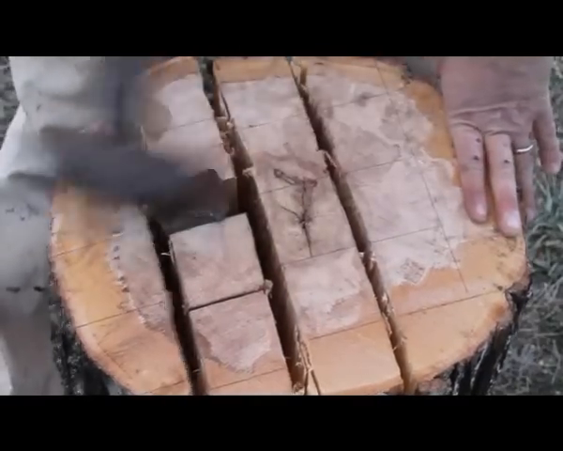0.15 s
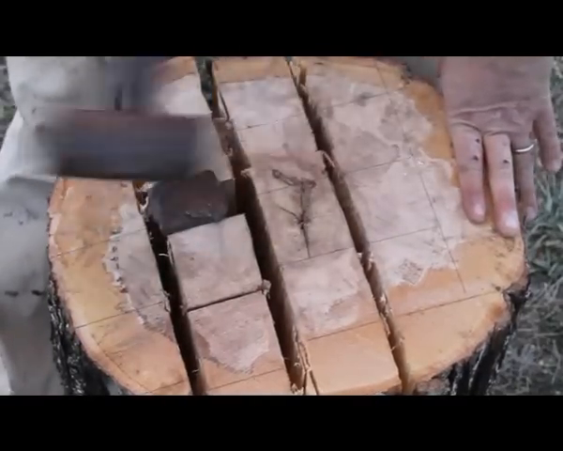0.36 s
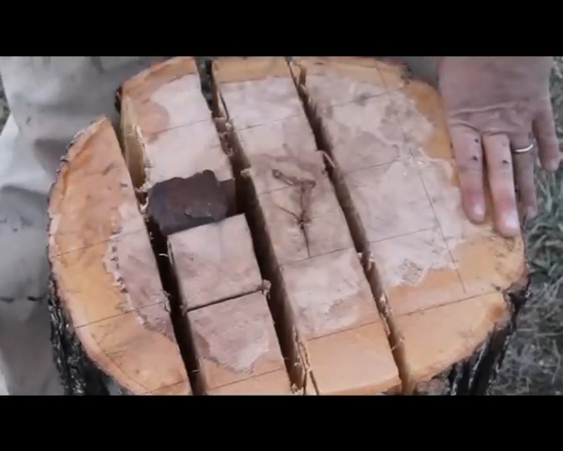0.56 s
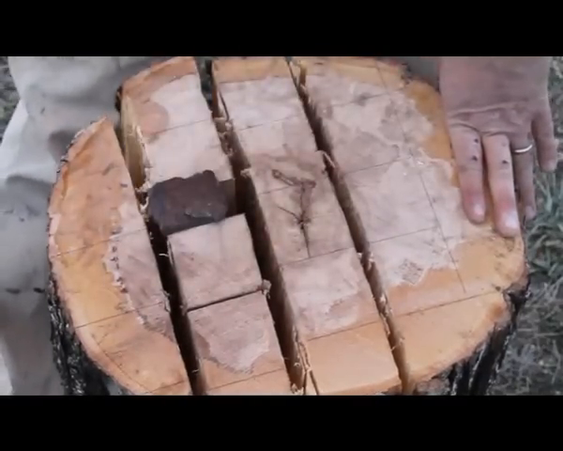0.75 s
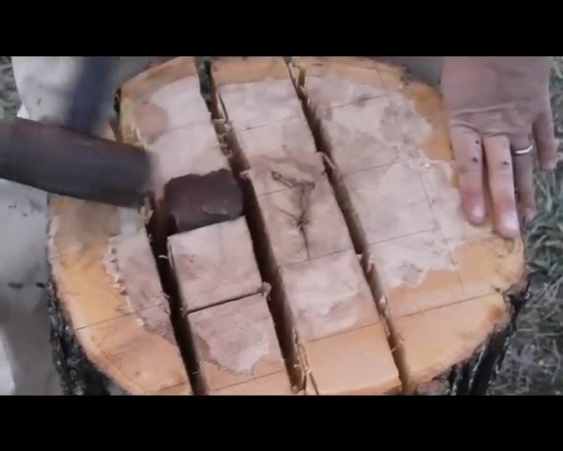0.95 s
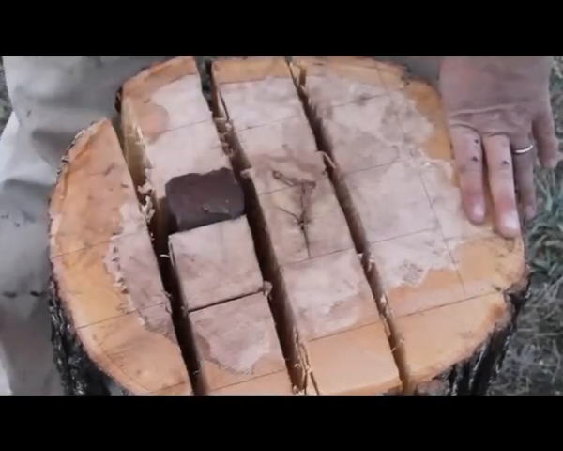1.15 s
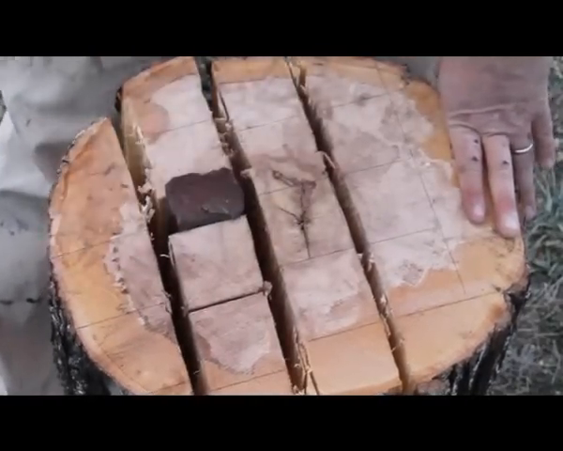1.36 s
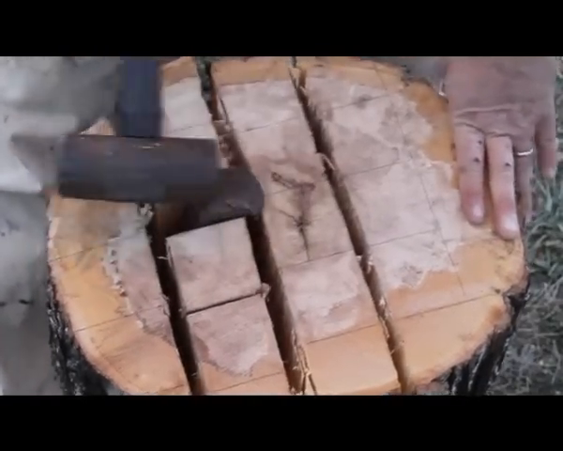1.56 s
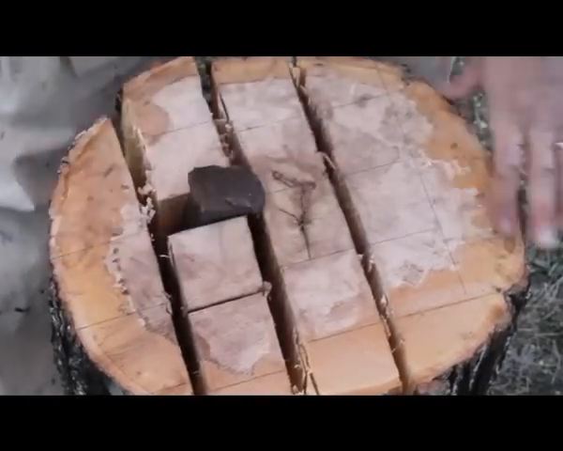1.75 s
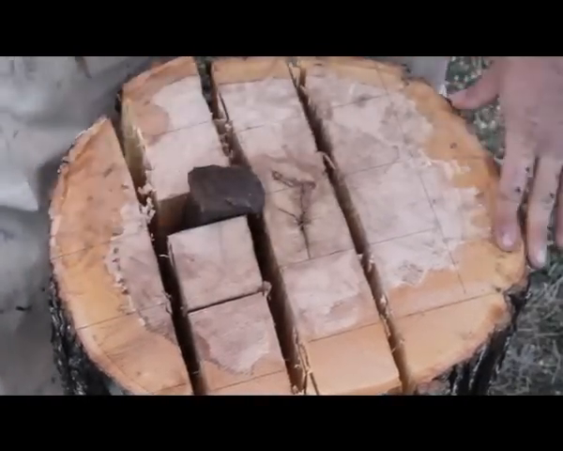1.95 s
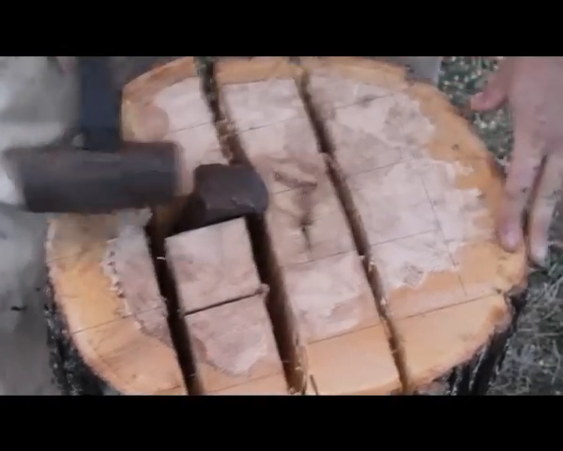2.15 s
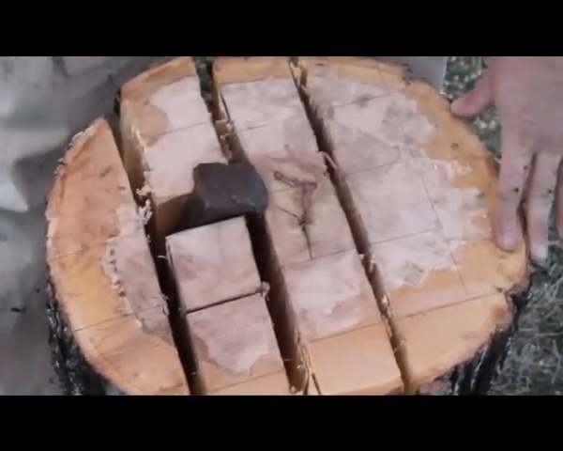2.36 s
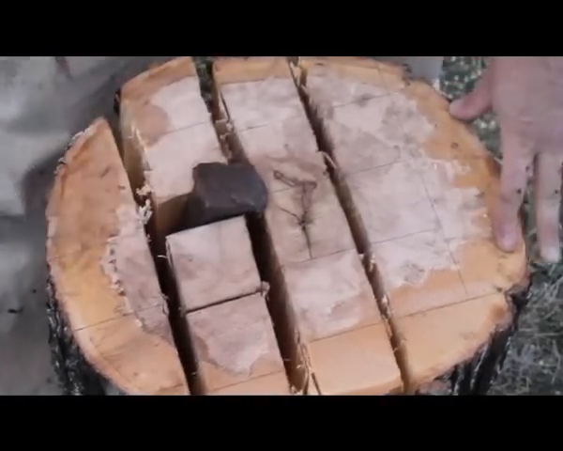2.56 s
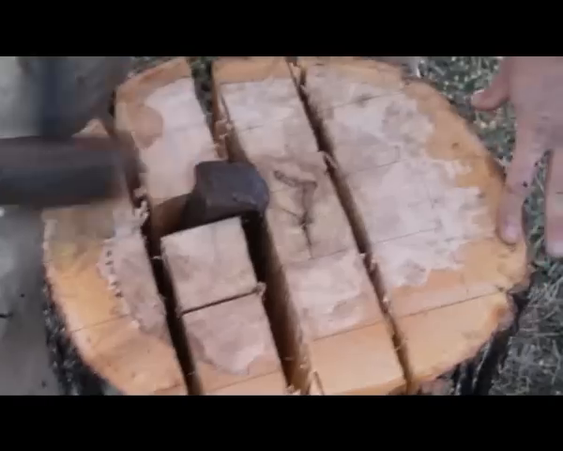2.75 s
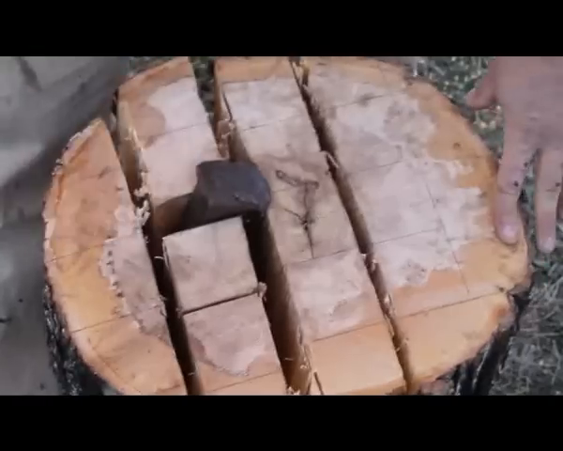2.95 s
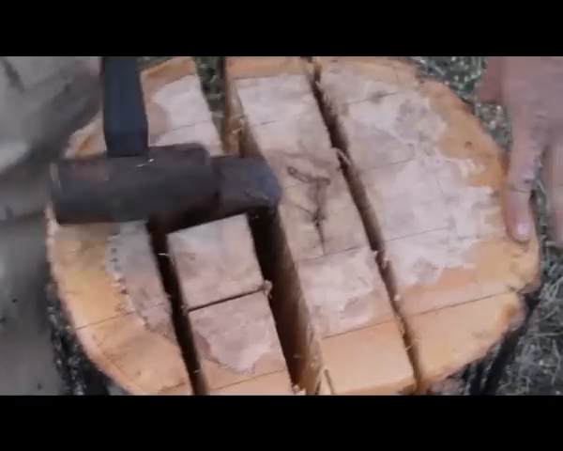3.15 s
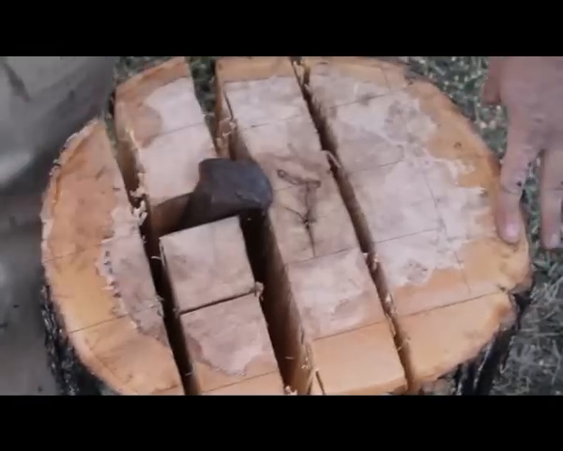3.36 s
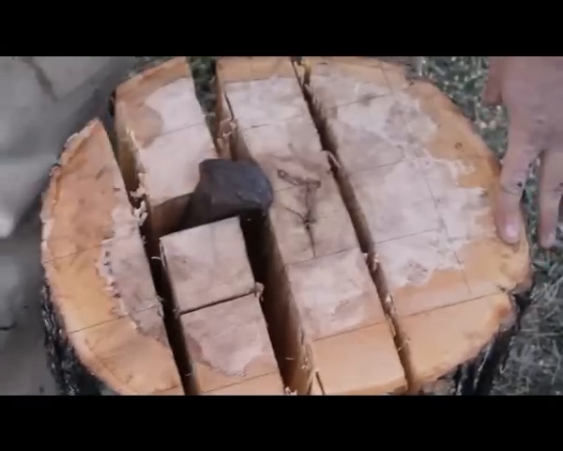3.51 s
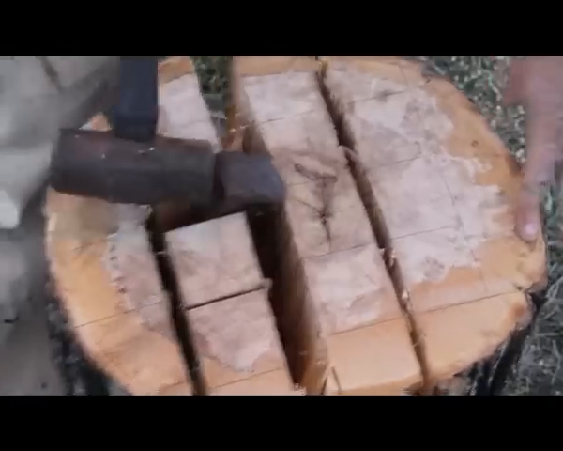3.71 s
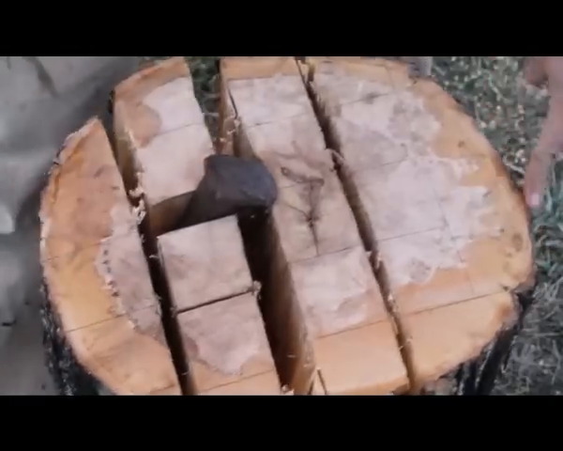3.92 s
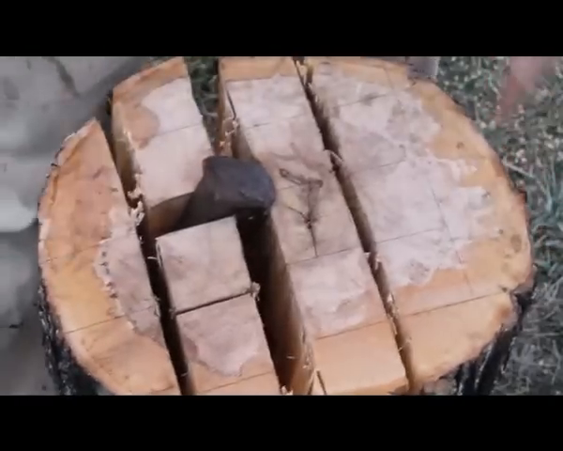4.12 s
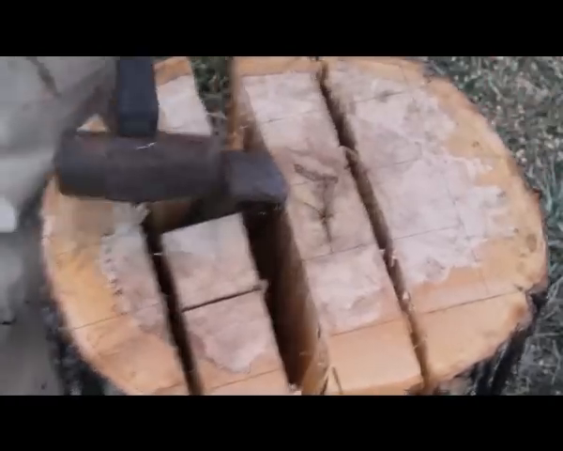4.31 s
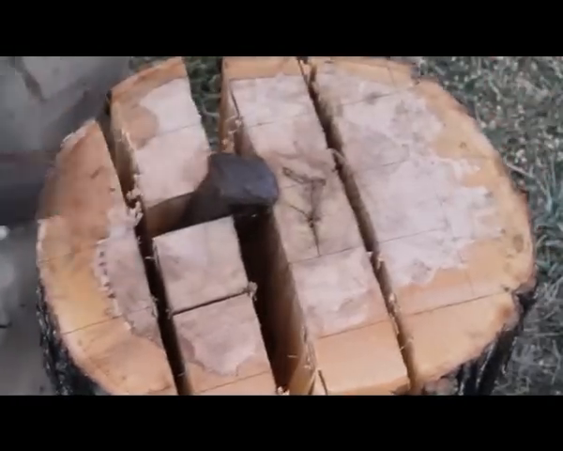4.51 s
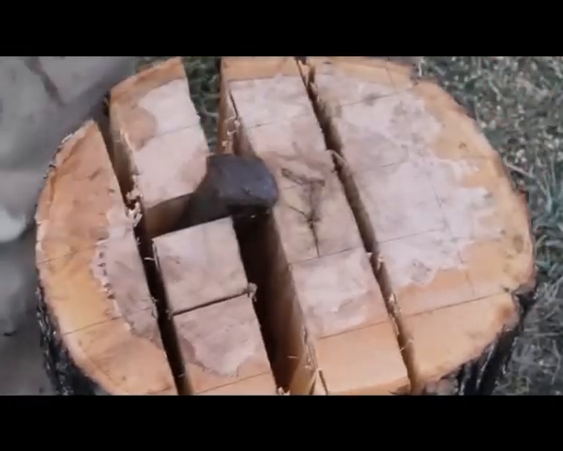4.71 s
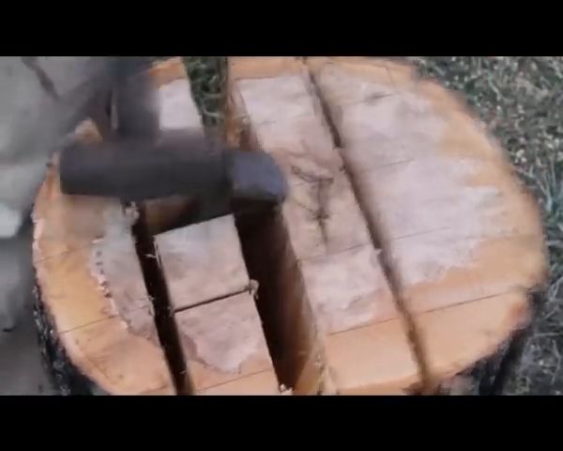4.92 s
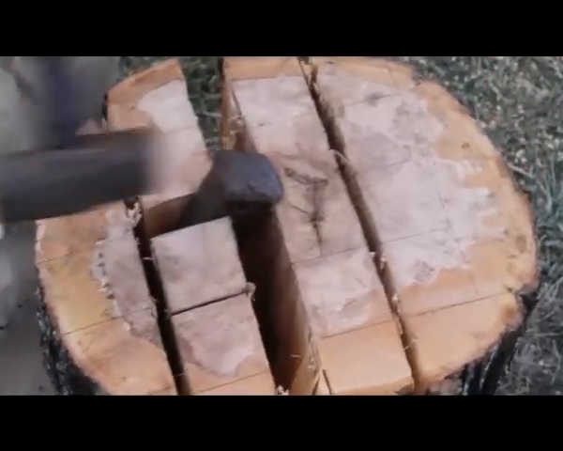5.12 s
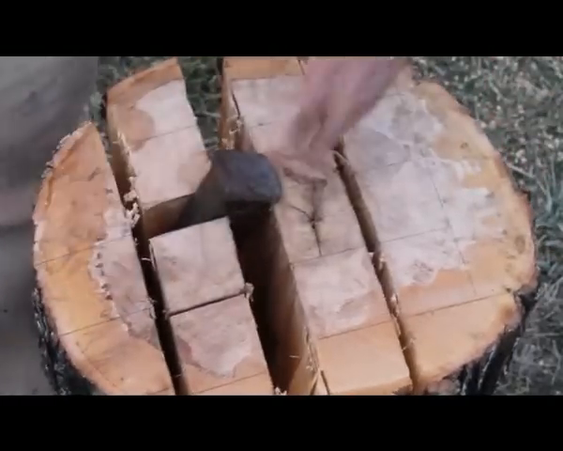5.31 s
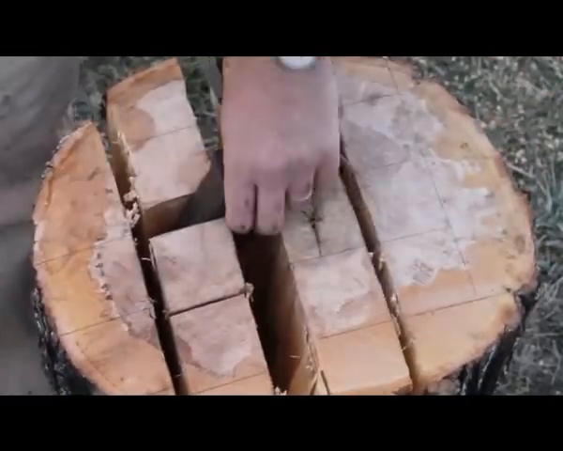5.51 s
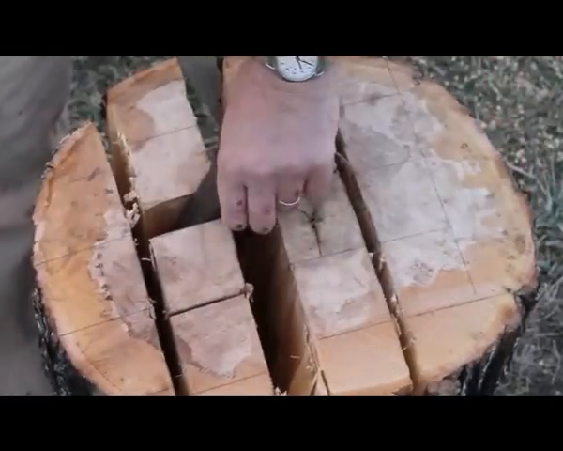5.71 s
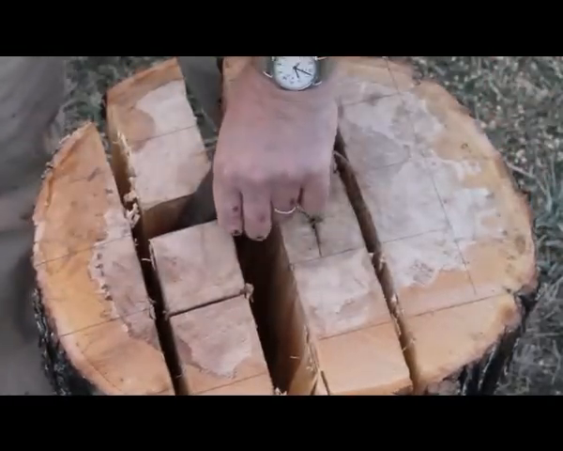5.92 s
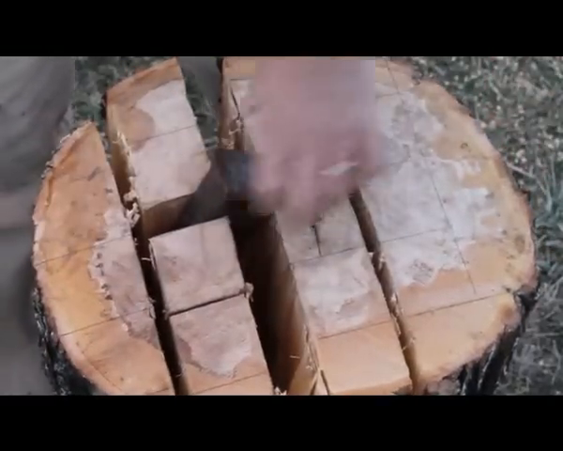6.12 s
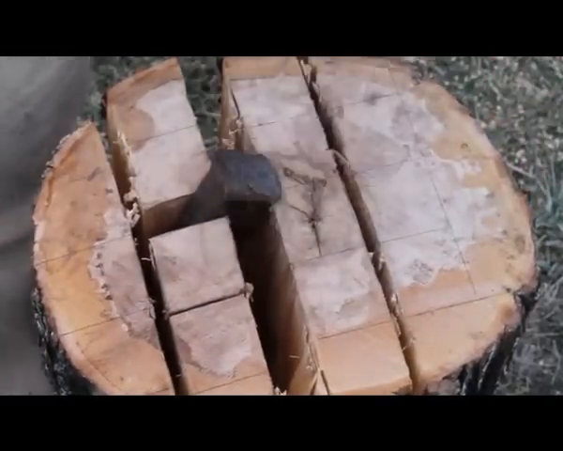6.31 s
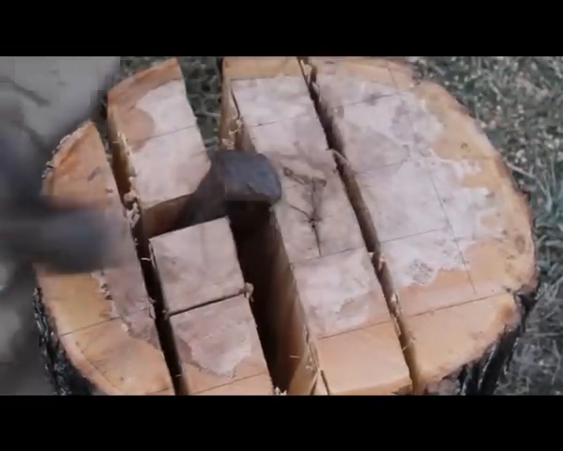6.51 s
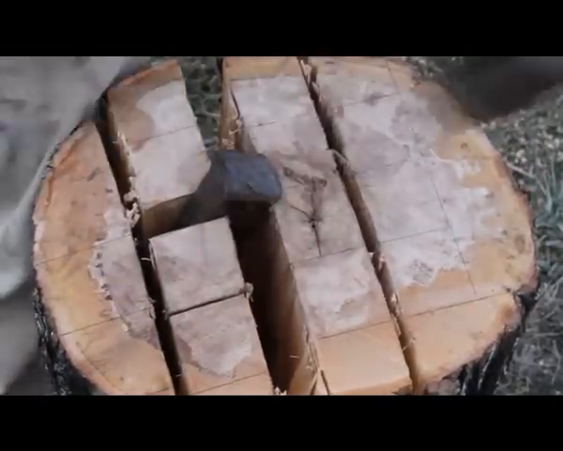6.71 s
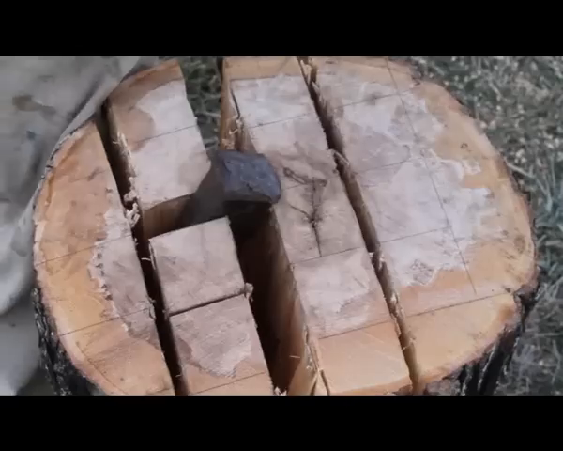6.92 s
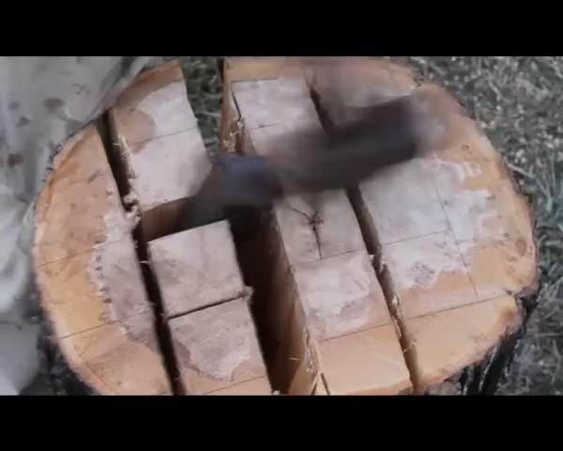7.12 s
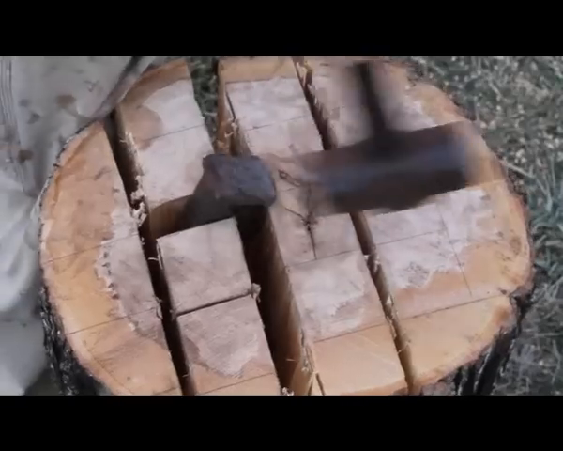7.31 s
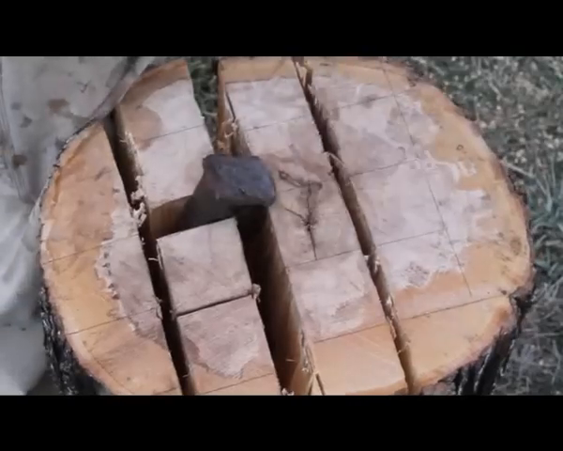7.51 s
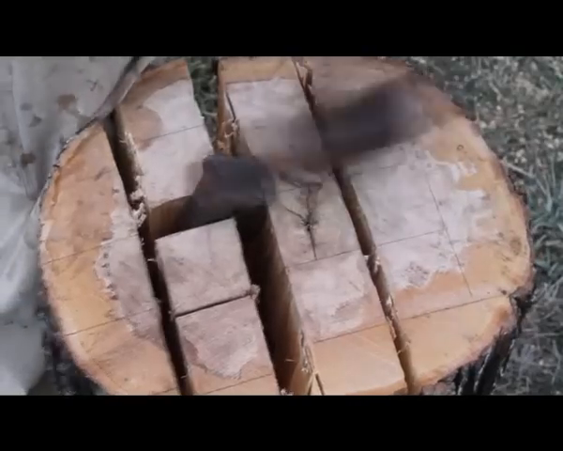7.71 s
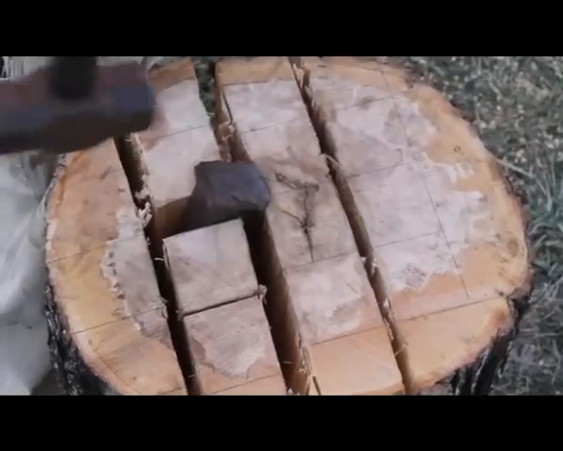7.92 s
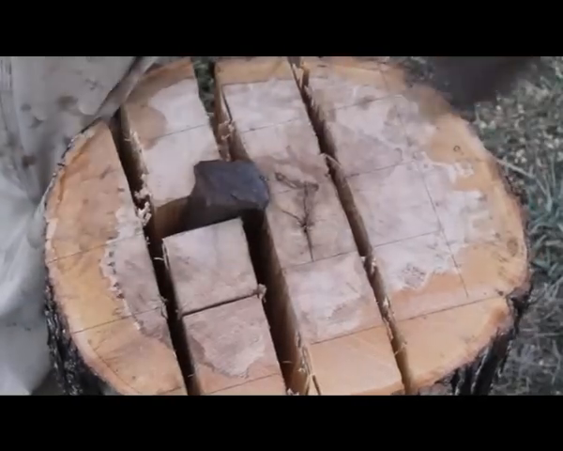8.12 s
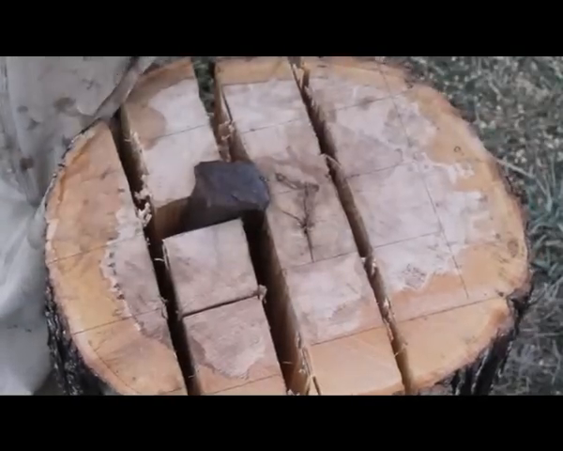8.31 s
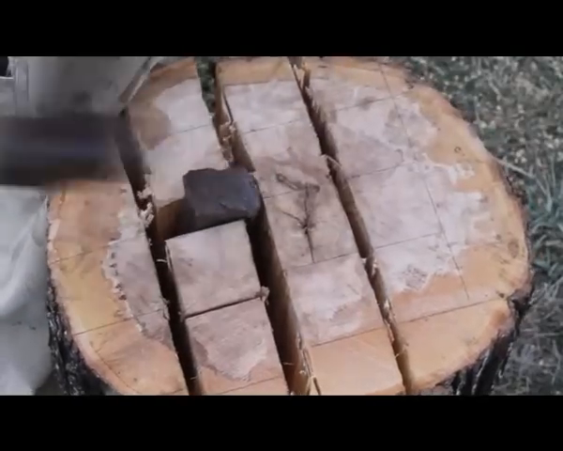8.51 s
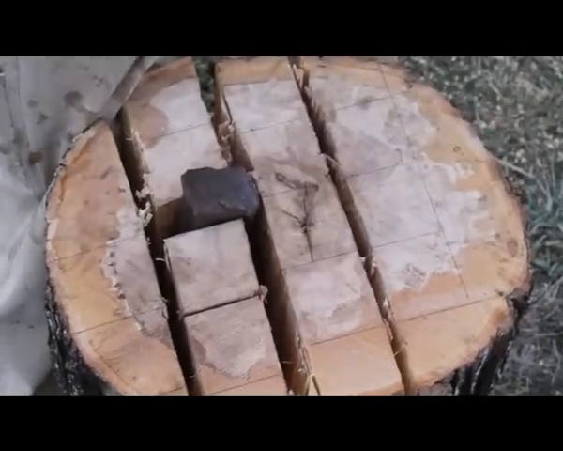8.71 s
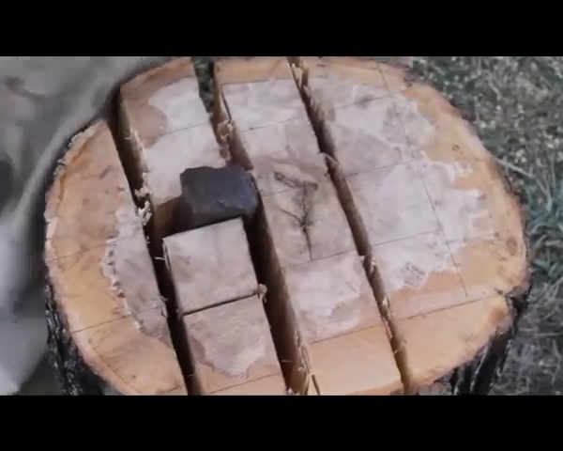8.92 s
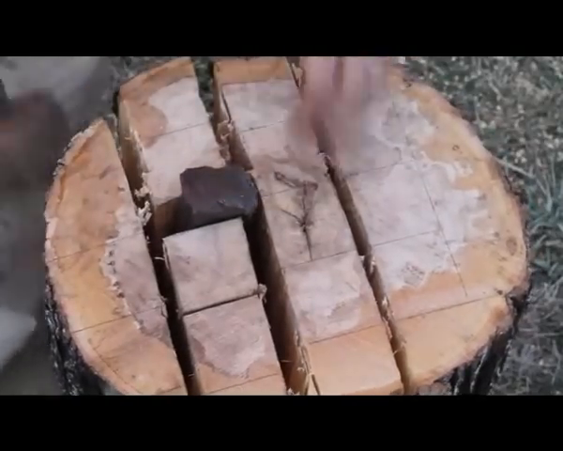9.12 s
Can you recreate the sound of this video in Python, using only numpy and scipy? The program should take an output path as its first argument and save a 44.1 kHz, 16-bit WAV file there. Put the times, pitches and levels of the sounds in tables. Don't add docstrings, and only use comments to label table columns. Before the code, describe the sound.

Close outdoor microphone, an arm's length from a log. A heavy hammer hits a steel wedge nine times at roughly half-second to seven-tenths spacing, each a hard crack with bright, brief ringing, a woody knock and loose billets rattling. Walls return quick slaps. A pause holds faint ticks and cloth rustle, then three duller blows with a wind gust and one last rustle over far traffic.

```python
import sys
import numpy as np
from scipy import signal
from scipy.fft import rfft, irfft, next_fast_len
from scipy.io import wavfile
from scipy.ndimage import map_coordinates

SR = 44100
rng = np.random.default_rng(int(sys.argv[2]) if len(sys.argv) > 2 else 0)


def master(y):
    cut = np.clip(np.atleast_2d(y).T, -1, 1)
    pcm = np.round(cut * 32767)
    wavfile.write(sys.argv[1], SR, pcm.astype(np.int16))


def undo_db(level):
    steps = np.asarray(level, float) / 20
    return 10 ** steps


N = 408363


def unit(x):
    return x / np.sqrt(np.mean(x ** 2) + 1e-20)


def along(points, hz):
    f, v = np.transpose(points)
    return np.interp(np.log(hz + 1), np.log(f + 1), v)


def curves(rows):
    s, *cols = np.transpose(rows)
    return [np.interp(np.arange(N) / SR, s, c) for c in cols]


def wobble(rate):
    knots = rng.standard_normal(int(N * rate / SR) + 4)
    return map_coordinates(knots, [np.arange(N) * rate / SR])


def noise(spectrum, size):
    m = next_fast_len(size)
    white = rfft(rng.standard_normal(m))
    colour = undo_db(along(spectrum, np.fft.rfftfreq(m, 1 / SR)))
    return unit(irfft(white * colour, m)[:size])


def add(track, s, x):
    part = track[max(round(s * SR), 0):][:len(x)]
    part += x[:len(part)]


# start in seconds, crack level in dB,
# dullness of the crack 0-1, yard return in dB, drive of edgewise wedge bending in dB.
BLOWS = [(0.2172, 2, 0.65, -9.5, -32), (0.9193, 2, 0.5, -2, -25), (1.5347, 0, 0.77, -6, -28),
         (2.144, 2.5, 0.51, -6, -22), (2.6789, 4.5, 0.18, -3, -35), (3.199, 4.5, 0.65, -7.5, -21),
         (3.7656, 4.5, 0.56, -5, -25), (4.368, 4.5, 0.54, -4.5, -25.5), (4.997, 0.5, 0.68, -2, -24),
         (7.2103, 1, 0.68, -10, -36), (7.8126, -3, 0.8, -12.5, -28), (8.5271, -3.6, 0.82, -10.5, -26.5)]
# drive in dB of flatwise bending, head lengthwise, twist, head face.
AIM = [(-22.5, -26, -38, -45.5), (-17, -37, -34, -19.5), (-23.5, -48.5, -30, -40), (-28.5, -57, -40.5, -74),
       (-22, -50, -17.5, -49), (-32.5, -54.5, -22.5, -56.5), (-25.5, -45, -16.5, -63),
       (-17, -51.5, -23, -58), (-19, -54.5, -17, -42), (-45.5, -58, -40, -75.5), (-45.5, -56, -29.5, -41),
       (-55.5, -56, -28.5, -67)]
# frequency in Hz, motion (0 edgewise, 1 flatwise, 2 lengthwise, 3 twist,
# 4 face, 5 shoulder).
WEDGE_HZ = [(4330, 0), (4745, 1), (9240, 3), (4395, 0), (4810, 1), (4570, 1), (7600, 0), (5350, 0)]
HEAD_HZ = [(8520, 2), (11495, 5), (14195, 4), (12400, 2), (9790, 5), (15630, 4), (10290, 4), (13460, 4),
           (14850, 4)]
# t60 in seconds, level in dB, split from its twin in Hz.
WEDGE = [(.11, 11, 7.7), (.115, 11.5, 14), (.2, 10, 10), (0.1, 5, 10), (.1, 7, 12), (.04, -7, 9),
         (0.27, -21, 6), (0.11, -6, 9)]
HEAD = [(0.43, 8, 6.3), (0.35, 1, 11), (.16, 12, 7), (.3, -17.5, 4), (0.042, -7.5, 9), (.3, -4.5, 3.8),
        (0.19, -8, 6), (0.095, -3, 12), (.12, -13.5, 6)]


def shoulder_drive(long_db, face_db):
    end_on_loss_db = 2 * max(long_db + 34.5, 0)
    return -29 + 0.13 * (face_db - long_db) - end_on_loss_db


def ring(drive_db, t):
    blow = np.zeros(len(t))
    for (hz, motion), (t60, level_db, split_hz) in zip(WEDGE_HZ + HEAD_HZ, WEDGE + HEAD):
        bending = motion < 2
        turn = 2 * np.pi * (hz * t + rng.random())
        twin = 0.9 * np.sin(turn + 2 * np.pi * split_hz * t + rng.normal(0, 0.91))
        clang = bending * undo_db(5.5 - 60 * t / 0.055)
        fade = undo_db(-60 * t / t60) + clang
        blow += undo_db(drive_db[motion] + level_db) * fade * (np.sin(turn) - twin * (not bending))
    return blow * (1 - np.exp(-t / 0.0001))


def crack_noise(crack_db, dull, t):
    crack = signal.lfilter([1], [1, -np.clip(dull, 0, .9)], rng.standard_normal(len(t)))
    crack = signal.lfilter(*signal.butter(1, 11000, fs=SR), crack)
    return crack * undo_db(crack_db + 3.5 - 60 * t / 0.015)


def steel():
    out, t = np.zeros(N), np.arange(SR * 2 // 5) / SR
    for (s, crack_db, dull, yard_db, edge_db), (flat_db, long_db, twist_db, face_db) in zip(BLOWS, AIM):
        drive_db = edge_db, flat_db, long_db, twist_db, face_db, shoulder_drive(long_db, face_db)
        blow, crack = ring(drive_db, t), crack_noise(crack_db, dull, t)
        add(out, s, blow + crack)
        echo(out, s, yard_db, (blow + undo_db(-1) * crack)[:SR // 4])
    return out


# start in seconds, peak in dB, strongest pitch in Hz.
THUDS = [(.215, 0.5, 487), (.916, -6.5, 1150), (1.529, 2, 480.3), (2.137, -1.6, 411.3), (2.679, -5, 960),
         (3.199, 2.5, 912), (3.765, 2, 861), (4.367, -9, 519.8), (4.997, -1, 964), (7.192, 2, 389.7),
         (7.813, -2, 452), (8.526, -0.8, 2240)]
# start in seconds, peak in dB, strongest pitch in Hz,
# brightness in dB per octave.
RATTLES = [(.212, 1, 736, 6), (.247, -0.5, 520, 1.9), (0.31, -33, 360, -3), (0.942, -8.5, 490, -0.5),
           (1.559, -7, 403, -2), (1.576, -10, 617, -0.5), (1.594, -14.5, 528, -2.5), (2.145, 0, 1310, 2.2),
           (2.163, -7.5, 460, -6.5), (2.196, -11.5, 936, -2.1), (2.738, -10, 890, -3.5),
           (2.759, -6, 1510, -6), (2.762, -12, 440, -1), (3.222, -15.5, 428, -3), (3.26, -6.5, 1600, -3.3),
           (3.262, -8.5, 445, -3), (3.829, -9.5, 435.3, -3.5), (3.839, 1, 1600, 0.5),
           (4.169, -30, 783, 4.5), (4.427, -11, 559, -6), (5.059, -13, 428, -4.5), (5.209, -31, 490, -5),
           (7.21, -4.4, 740, -7.2), (7.224, -2.5, 420, 1.5), (7.271, -7, 916, -3), (7.317, -19, 820, -6.5),
           (7.824, -3, 720, 4.5), (8.54, -4, 586, -6.5)]
# frequency in Hz, width in Hz, level in dB.
LOG = [(338.7, 245, -3), (490, 85, -0.5), (883, 140, 2.5), (1230, 150, -3.5), (1600, 440, -5),
       (2240, 177, -3.5), (3180, 660, -11.5)]


def log():
    out, size = np.zeros(N), SR // 4
    t, f = np.arange(size) / SR, np.fft.rfftfreq(size, 1 / SR)
    contact_s, wood_top_hz = .0012, 2330
    thuds = [(*row, 0.8, .06) for row in THUDS]
    rattles = [(*row, 0.033) for row in RATTLES]
    for s, peak_db, hz, bright_db, t60 in thuds + rattles:
        modes = [(c, w, g + rng.normal(0, 1) + bright_db * np.log2(c / 800)) for c, w, g in LOG]
        modes.append((hz, .12 * hz, 11.5))
        body = 0
        for k, (c, w, g) in enumerate(modes):
            body = body + (-1) ** k * undo_db(g) * 1j * f * w / (c * c - f * f + 1j * f * w)
        push = rng.standard_normal(size) * undo_db(-60 * t / t60) * (1 - np.exp(-t / contact_s))
        push[round(contact_s * SR)] += 3
        knock = irfft(rfft(push) * body / (1 + 1j * f / wood_top_hz), size)
        knock = knock * np.cos(2 * np.pi * t) ** 2
        knock = knock * undo_db(peak_db + 3.0) / np.abs(knock).max()
        add(out, s, knock)
        echo(out, s, -13.0, knock)
    return out


# delay in seconds, level in dB, smear in seconds.
ECHOES = [(.014, -9.5, 0.013), (.032, -6, .01), (0.058, -24, 0.046), (.098, -11.5, .007), (.143, -23, .008),
          (.13, -21.5, 0.04), (0.188, -40, .01), (.295, -31.5, 0.02)]
# frequency in Hz, level in dB.
WALLS = [(100, -5), (400, -5.5), (1400, 1.5), (3000, -6), (4700, 1), (6000, -16), (10000, -22),
         (16000, -35.5)]
FACING_DB = (-5, -8.5)


def yard(x):
    t = np.arange(int(SR * 3 / 5)) / SR
    bunches = sum(undo_db(db) * np.exp(-.5 * ((t - s) / smear) ** 2) for s, db, smear in ECHOES)
    scatter = undo_db(-35 - 60 * t / 3.34) * np.clip((t[-1] - t) * 10, 0, 1)
    tail = noise(WALLS, len(t)) * (bunches + scatter) * (t > .004) * undo_db(-34.0)
    return signal.fftconvolve(x, tail)


def echo(track, s, db, x):
    add(track, s, undo_db(db + FACING_DB[s > 6]) * yard(x))


# start in seconds, peak in dB.
TICKS = [(4.0234, -34.5), (4.1708, -43), (4.2373, -20.5), (5.7294, -53), (6.3888, -41.5), (6.4144, -51)]


def splinters():
    out, t = np.zeros(N), np.arange(SR // 40) / SR
    for s, peak_db in TICKS:
        add(out, s, undo_db(peak_db - 4.0 - 60 * t / 0.013) * rng.standard_normal(len(t)))
    return out


# start in seconds, peak in dB, frequency in Hz.
PUFFS = [(3.963, -31, 111), (4.466, -25, 200), (4.554, -38, 150), (4.745, -23, 135.6),
         (5.599, -34.5, 110.5), (5.715, -33.5, 110.4), (7.048, -27, 91.5), (7.118, -25.5, 96),
         (7.186, -22, 197), (7.312, -18, 151), (7.386, -24, 124.5), (7.428, -40, 131),
         (7.482, -20.5, 107.5), (7.54, -47, 137), (7.649, -28, 72.7), (7.677, -23, 138),
         (7.704, -15.5, 120), (7.721, -23, 131), (7.759, -35, 72.7), (7.896, -41, 119),
         (8.322, -46.5, 74.5)]


def wind():
    out, t = np.zeros(N), np.arange(SR // 10) / SR
    for s, peak_db, hz in PUFFS:
        lump = (t / 0.012) * np.exp(-t / 0.0059)
        add(out, s, undo_db(peak_db + 8) * lump * np.sin(2 * np.pi * (hz * t + rng.random())))
    return out


# peak time in seconds, level in dB, rise and fall in dB per second.
SCUFFS = [
    (5.75, -62.5, 21, 10),
    (6.73, -49, 41.5, 62),
    (8.899, -47.5, 105, 49.5),
]
# frequency in Hz, level in dB per Hz.
WEAVE = [(200, -19.5), (500, 0.5), (1500, -0.5), (3000, -2.5), (8000, -5), (12000, -16), (16000, -21.5)]


def cloth():
    t = np.arange(N) / SR
    rub = 0
    for s, db, rise, fall in SCUFFS:
        rub = rub + undo_db(db - np.where(t < s, rise * (s - t), fall * (t - s)))
    return rub * undo_db(1.07 * wobble(31) + 1.8 * wobble(120)) * noise(WEAVE, N)


# time in seconds, firing tone in Hz, rms level in dB.
ENGINE = [(0, 124.7, -45.5), (.5, 126, -43), (1.2, 128, -39), (1.45, 122, -42.5), (1.7, 109.3, -46.5),
          (2.1, 92.7, -56), (2.5, 84.3, -63.5), (3, 76.3, -61)]


def engine():
    hz, engine_db = curves(ENGINE)
    turn = 2 * np.pi * np.cumsum(hz * (1 + 0.01 * wobble(21))) / SR
    orders = np.sin(turn) + undo_db(-12.0) * np.sin(turn * 7 / 6) + undo_db(-21.5) * np.sin(2 * turn)
    return np.sqrt(2) * undo_db(engine_db + 1.1 * wobble(3.8)) * orders


# time in #
# seconds, level in dB.
STREET = [(0, -53.5), (2.2, -52.5), (2.6, -55.5), (4.5, -52), (5.3, -52.5), (5.7, -55.5), (6.3, -57),
          (6.75, -50.5), (7.1, -56.5), (9.26, -56.5)]
# frequency in Hz, level in dB per Hz.
TRAFFIC = [(150, -31.5), (250, -10), (370, -5.5), (662, -5.5), (875, -3), (1350, -4.5), (1580, -6),
           (16000, -36.5)]
RUMBLE = [(15, -30), (35, -6), (70, -4), (130, -0.5), (190, -2), (300, -14), (500, -47.5)]


def street():
    hiss = undo_db(curves(STREET)[0] + 5.5 + 0.44 * wobble(2.3)) * noise(TRAFFIC, N)
    gust_s, gust_lasts_s = 7.34, 0.25
    gust_db = 13 * np.exp(-((np.arange(N) / SR - gust_s) / gust_lasts_s) ** 2)
    rumble = undo_db(-55.5 + gust_db + 3.5 + 2.1 * wobble(12)) * noise(RUMBLE, N)
    return hiss + rumble


def scene():
    no_bass = signal.butter(2, 151.2, "high", fs=SR, output="sos")
    struck = signal.sosfilt(no_bass, steel() + log())
    return (struck + splinters() + wind() + cloth() + engine() + street())[None]


def top_cut(x):
    return signal.sosfilt(signal.butter(12, 16440, fs=SR, output="sos"), x)


def record(dry):
    keep = np.exp(-1 / (0.054 * SR))
    level = np.sqrt(signal.lfilter([1 - keep], [1, -keep], dry ** 2))
    x = dry / (1.5 + level / 6.6)
    x = x / (1 + np.abs(x) ** 8) ** (1 / 8)
    x = signal.sosfiltfilt(signal.butter(12, 16420, fs=SR, output="sos"), x)
    return top_cut(x)


dry = scene()
out = record(dry)
master(out)
```